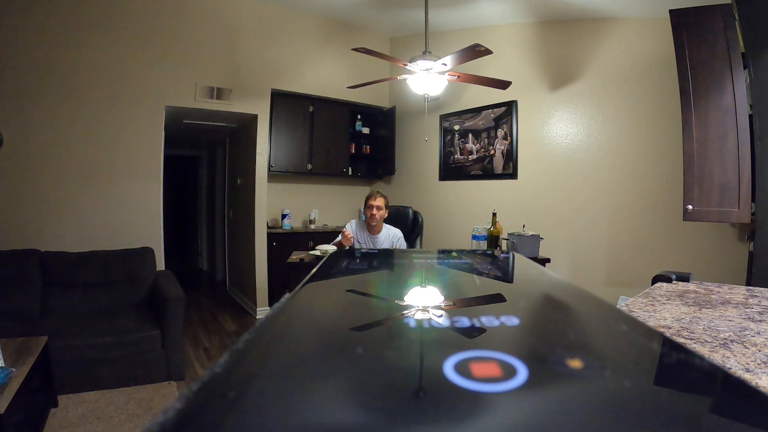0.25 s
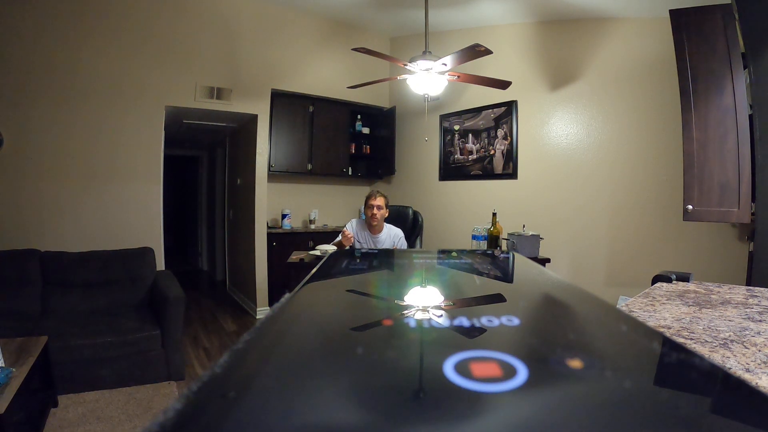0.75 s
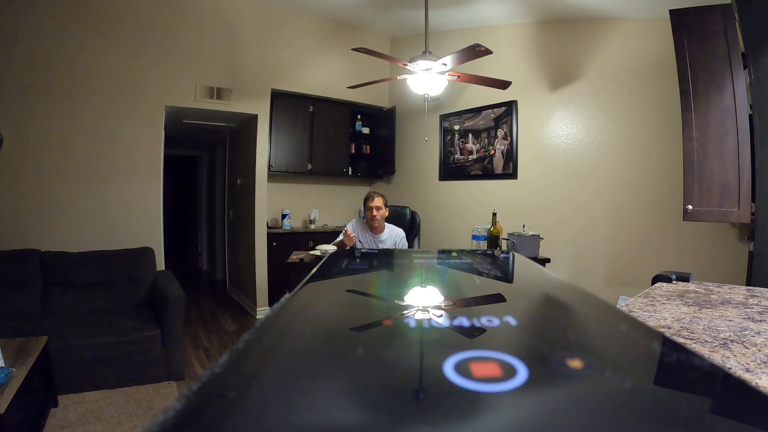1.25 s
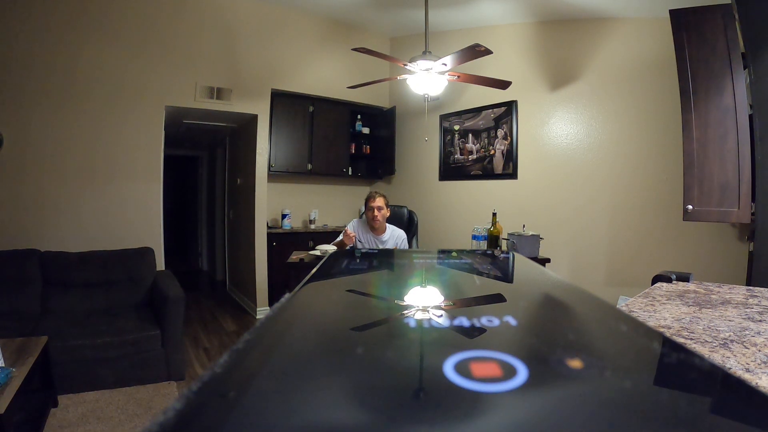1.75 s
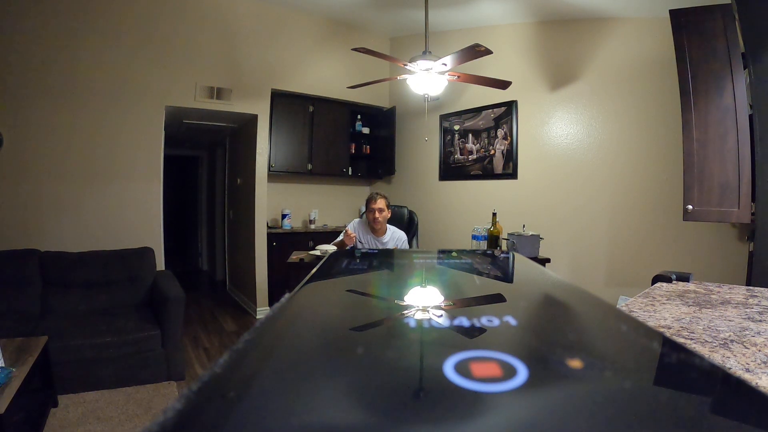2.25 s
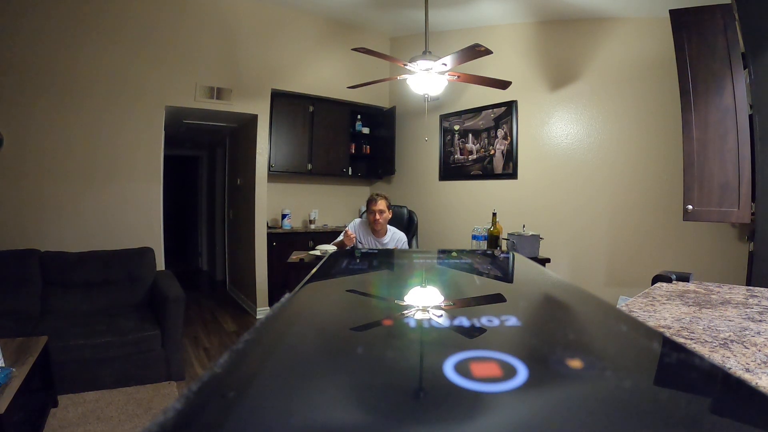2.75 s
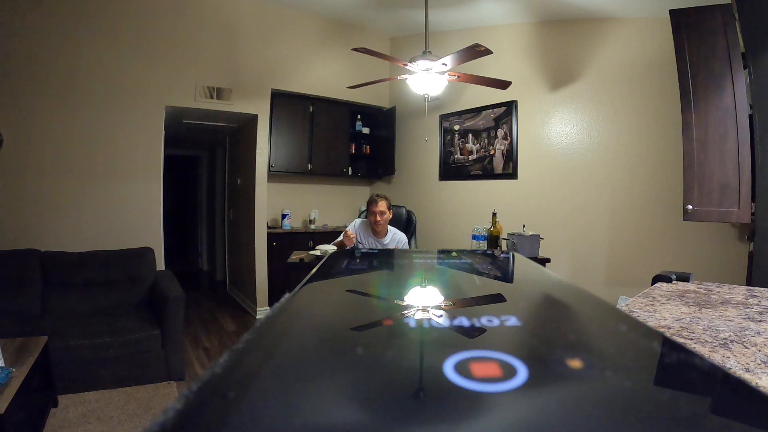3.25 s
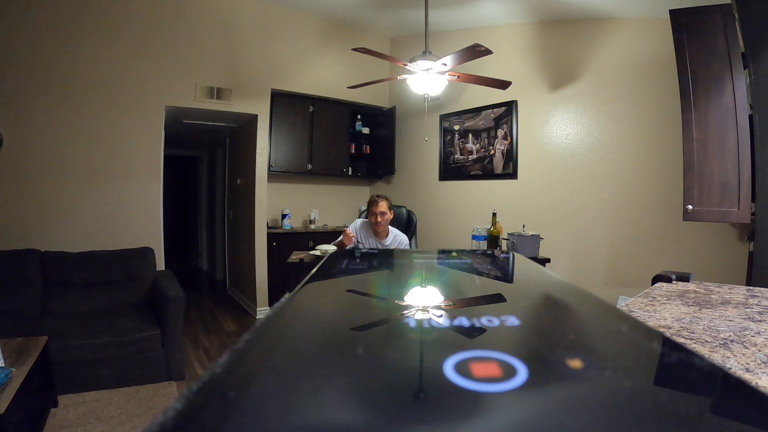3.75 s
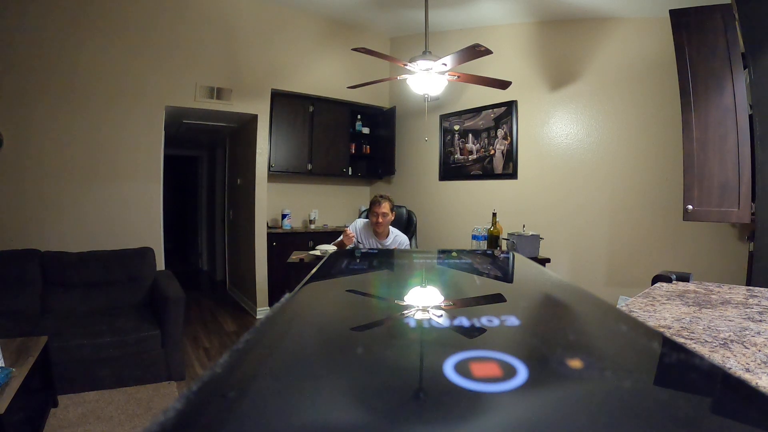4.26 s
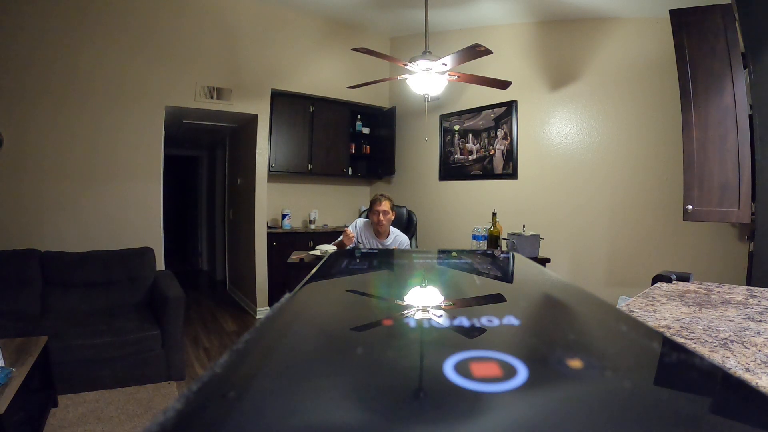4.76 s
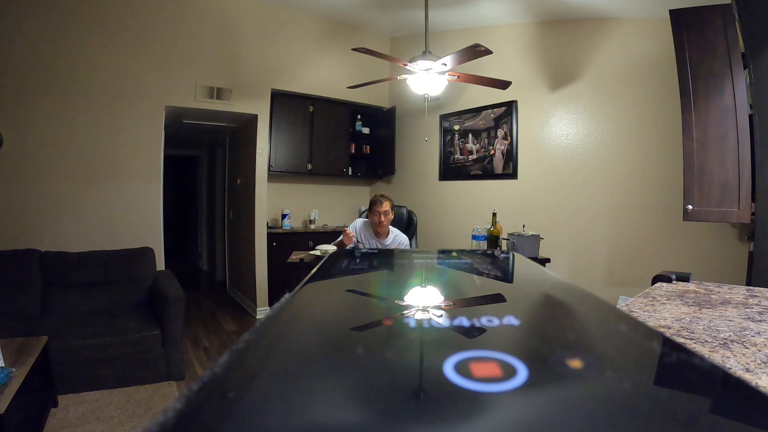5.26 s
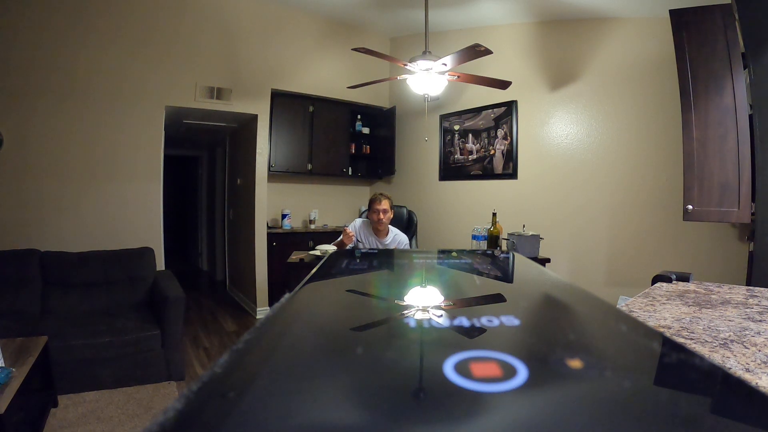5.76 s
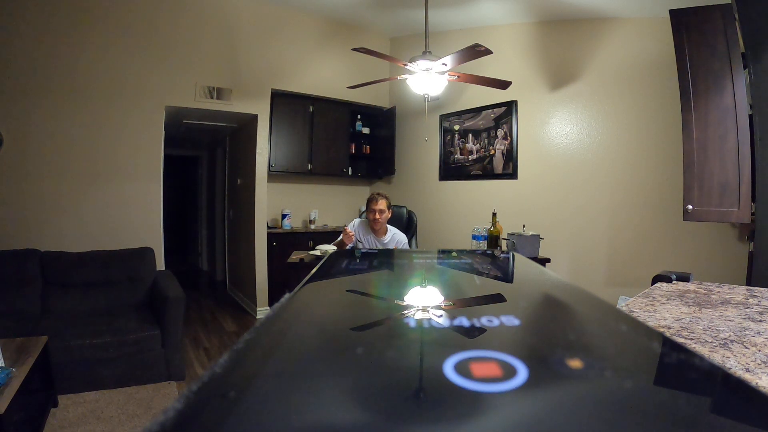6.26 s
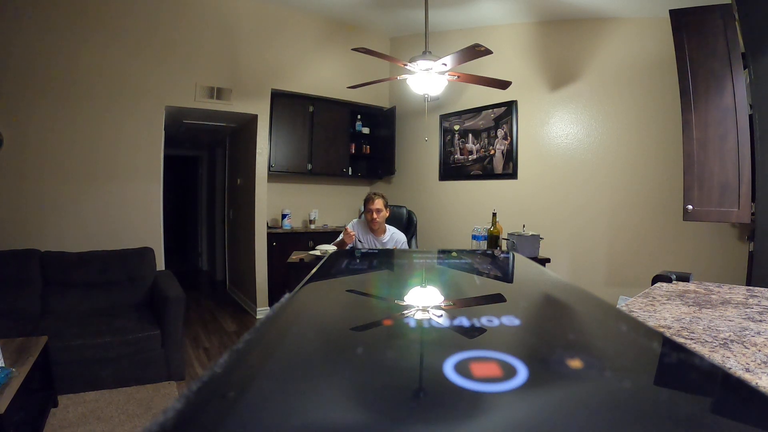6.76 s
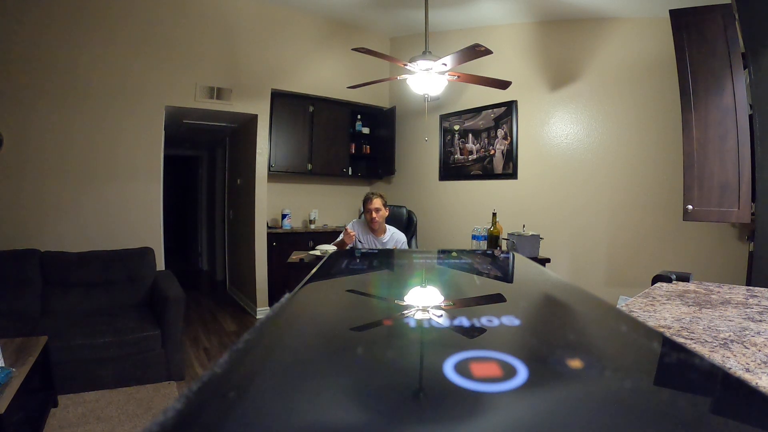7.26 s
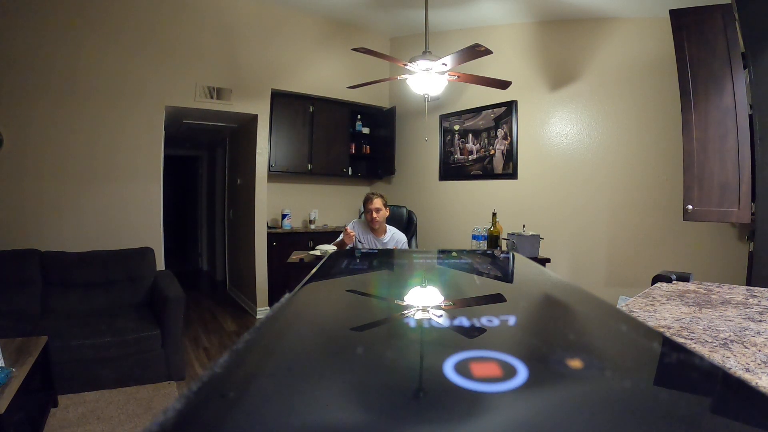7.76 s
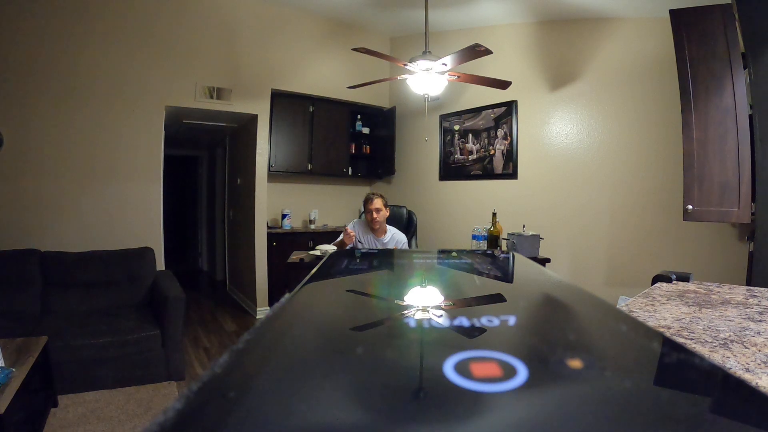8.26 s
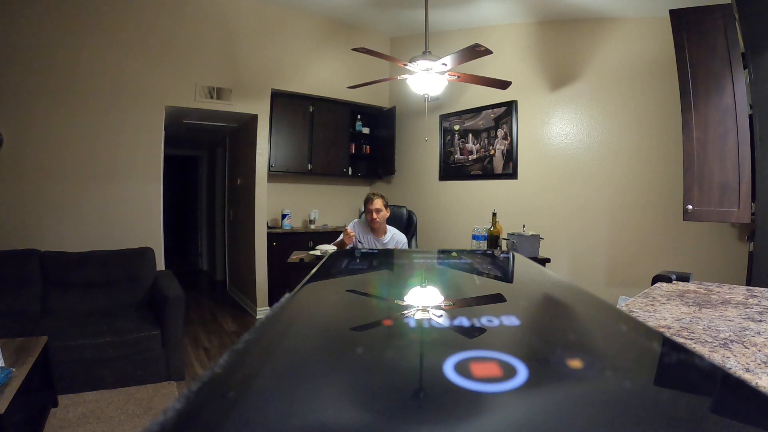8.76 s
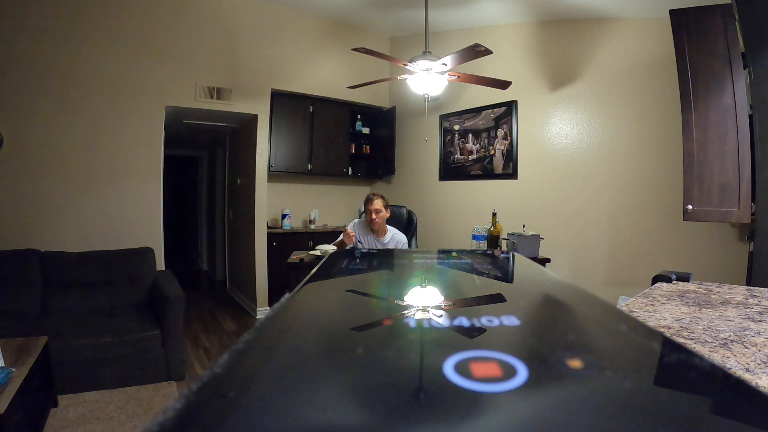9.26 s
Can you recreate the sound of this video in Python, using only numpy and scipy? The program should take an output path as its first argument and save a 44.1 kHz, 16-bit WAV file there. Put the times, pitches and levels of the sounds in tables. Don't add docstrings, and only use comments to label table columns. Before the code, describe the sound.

A quiet furnished living room, heard in stereo from a table top. Throughout, a refrigerator across the room gives a deep buzzing hum with a gentle throb about every third of a second, low fan tones, soft moving air and a thin, faint high whine that strengthens slightly later. Very light cloth rustles come and go from the start. A small crisp tick sounds at 1.2 s, a dull knock with a brief chair creak at 1.8 s. Rustling grows from 2.2 to 3 s, then at 3.1 to 3.3 s a rapid run of knocks rattles the table, close, woody and short, with a strong tick inside and weaker bumps until 3.45 s. Faint cloth follows until about 6 s, with a barely audible creak near 6. Dull little ticks come at 8.0 and 8.4 s; the hum continues unchanged to the end, near 9.5 s.

```python
import sys
import numpy as np
from scipy import signal
from scipy.fft import rfft, irfft, next_fast_len
from scipy.io import wavfile
from scipy.ndimage import uniform_filter1d

SR = 44100
rng = np.random.default_rng(int(sys.argv[2]) if len(sys.argv) > 2 else 0)


def transcribe(signal):
    frames = np.atleast_2d(signal).T
    limited = np.clip(frames, -1, 1)
    pcm = np.round(limited * 32767).astype(np.int16)
    wavfile.write(sys.argv[1], SR, pcm)


def decibels_to_gain(level_db):
    exponent = np.asarray(level_db, float) / 20
    return 10 ** exponent


N = 419391
TIME = np.arange(N) / SR
LONG = next_fast_len(N)
HZ = np.fft.rfftfreq(LONG, 1 / SR) + 1e-3

SHAFT_HZ, MAINS_HZ = 58.507, 119.99
THROB_S, SLIP_DEPTH = .125, .12
ROOM_T60_S, ROOM_TOP_T60_S = .45, .35

# (order [multiple of shaft], level [dB], left minus right [dB])
SHAFT_ORDERS = [(2, -49, 2.5), (3, -63.5, 0), (4, -55.5, 1.5), (5, -58.5, 4), (6, -53.5, 3), (7, -61, 3),
                (9, -62.5, 5.5), (13, -78, 3), (19, -82, 2), (31, -73.5, 4), (32, -78.5, 6.5),
                (40, -85.5, 2), (42, -86.5, 1), (49, -90, 10.5), (53, -80.5, 3.5), (54, -78, 1),
                (55, -83, 4), (57, -85.5, 9.5), (58, -82.5, 7.5), (59, -94.5, 14), (25, -93, 4),
                (34, -86.5, 4), (45, -101, 0), (51, -91.5, 0), (52, -90, 7), (8, -73.5, 1), (10, -79, 5),
                (11, -86, 3), (12, -85, 1), (14, -97, -6), (15, -83, 0), (17, -93, 4), (20, -91, 4),
                (21, -97, -6), (22, -103, -6), (24, -101, -6), (26, -99, 6), (27, -108, 0), (28, -94, 1),
                (30, -94, -3), (33, -86.5, 3), (36, -95, 11), (37, -99, 9), (38, -101, 8), (47, -93.5, 1),
                (60, -99, 14)]
# (order [multiple of shaft], level [dB], left minus right [dB])
VALVE_ORDERS = [(66, -90, 6), (68, -92, 9), (69, -90, 6), (71, -86.5, 0.5), (72, -90, 6), (73, -79.5, 9),
                (74, -76, 12), (75, -96, -2), (76, -84.5, 7), (77, -88, 2.5), (80, -99, 0), (86, -91, 7),
                (97, -93, 5), (101, -93.5, -4), (113, -91, -12), (114, -90.5, -9), (115, -92.5, 4),
                (116, -93.5, -4), (118, -104, -6), (125, -92, 8), (126, -96, 7), (128, -92, -5),
                (129, -98, 16), (61, -93, 5), (62, -108, -6), (63, -102, 7), (65, -101, 12), (67, -92, -6),
                (70, -102, 9), (82, -93, 8), (87, -92, 7), (89, -99, 7), (92, -98, 7), (94, -96, 5),
                (100, -95, 0), (104, -108, 7), (112, -96, 6), (117, -101, 1), (123, -97, 6), (131, -100, 3),
                (134, -110, -10), (136, -113, 0), (137, -106, -12), (144, -114, 6), (146, -115, 0),
                (151, -106, 7), (152, -108, 2), (154, -116, 2)]
# (frequency [Hz], level [dB])
SHELL_LEVEL = [(500, -89.5), (1000, -89), (2500, -94), (3700, -98), (5000, -97), (6300, -106), (7400, -100),
               (8200, -116), (9000, -114)]
# (time [s], level [dB])
VALVE_DRIFT = [(0, -2.5), (1.5, -3.5), (3, -3), (4.5, -.5), (6, .5), (7.5, -.5), (9.5, .5)]
# (frequency [Hz], level [dB], wander [dB])
FAN_TONES = [(43.04, -72, 1), (51.74, -59, 1.5), (64.26, -69, 1), (96.7, -67, 1), (188.26, -68, .8),
             (206.89, -50, 1.5), (301.15, -60, 1.2), (376.44, -59, 1.2), (489.5, -76, 2), (773, -86, 2),
             (4404.87, -88, 1.5)]
# (time [s], peak level [dB], contact [ms], low mode level [dB])
TABLE_BLOWS = [(3.113, -31, 1.6, 0), (3.122, -27, 1.3, -2), (3.133, -28, 1.2, -3), (3.149, -30, 1.0, -2),
               (3.165, -31, 3, 2), (3.177, -21, 1.8, 3), (3.189, -26, .9, -1), (3.198, -29, .7, -4),
               (3.209, -22, .9, -5), (3.222, -29, .8, -3), (3.234, -29, .8, -4), (3.248, -33, .9, -3),
               (3.265, -28, 1.8, -3), (3.356, -36, 3, -8), (3.406, -27, 2.5, -14), (3.439, -33, 3, -12)]
# (frequency [Hz], level [dB], T60 [s])
TABLE_MODES = [(36, -13, .3), (55, -6, .3), (113, -13, .15), (172, 3, .18), (214, -2, .08), (244, 2, .17),
               (290, -3, .07), (350, -2, .06), (431, -1, .07), (505, -2, .06), (640, -6, .025),
               (800, -4, .022), (1000, -3, .022), (1841, -15, .04)]
# (start [s], length [s], level [dB], drag [dB], edge [dB])
CLOTH_SLIDES = [(-.1, .3, -80, 6, -6), (.27, .14, -79, 5, 0), (.48, .4, -79, 5, -5), (.95, .22, -80, 2, -1),
                (1.35, .45, -83, 5, -4), (1.825, .11, -76, 5, 2), (1.98, .2, -80, 7, -3),
                (2.2, .24, -75, 0, -6), (2.4, .3, -71, 2, -5), (2.7, .38, -72, 1, -4),
                (3.108, .055, -66, 10, 0), (3.172, .055, -60, 9, -4), (3.35, .2, -74, 4, -4),
                (3.6, .12, -82, 0, -6), (3.88, .12, -78, 5, -10), (4.03, .1, -76, 2, -14),
                (4.38, .15, -77, 2, -8), (4.55, .18, -78, 4, -10), (5.7, .15, -81, 2, -12),
                (5.86, .12, -79, 0, -8), (6.05, .3, -85, 0, -6), (8.035, .04, -79, 5, -9),
                (8.42, .04, -85, 0, -2)]
# (frequency [Hz], density [dB per Hz])
CLOTH_HISS = [(1500, -40), (2400, -14), (3200, -1), (4000, 4), (5000, -2), (7000, -33), (9000, -58)]
# (frequency [Hz], density [dB per Hz])
CLOTH_DRAG = [(300, -30), (600, -3), (1000, 1), (1400, -1), (2000, 3), (2700, -4), (3400, -12), (6000, -55)]
# (frequency [Hz], density [dB per Hz])
CLOTH_EDGE = [(3000, -36), (4300, -6), (5500, 3), (7000, 0), (8300, -7), (10500, -19), (12500, -19),
              (15000, -30)]
# (time [s], peak level [dB], brightness [dB])
TICKS = [
    (0.002, -53, -4),
    (1.182, -38.5, 0),
    (1.49, -59, -8),
    (1.824, -46.5, -15),
    (3.126, -52, 4),
    (3.183, -40, -2),
    (4.47, -61, 3),
    (8.04, -57, -7),
    (8.358, -52.5, -8),
    (8.425, -75, 9),
]
# (frequency [Hz], level [dB], T60 [s])
TICK_MODES = [(850, -1, .007), (1250, 0, .005), (1900, -1, .005), (2600, -2, .0045), (3400, -2, .005),
              (4400, -4, .004), (5700, -5, .005), (7000, -11, .003), (8600, -17, .003)]
# (time [s], length [s], pitch [Hz], level [dB])
CREAKS = [
    (1.826, .06, 1900, -69),
    (5.96, .07, 2020, -81),
]
# (frequency [Hz], density [dB per Hz])
AIR_DENSITY = [(20, -84), (32, -88), (48, -76.5), (140, -78.5), (330, -77.5), (480, -81), (600, -88.5),
               (1000, -95.5), (1900, -101), (2500, -109), (7200, -117), (8000, -125), (10300, -136),
               (12500, -138)]
# (frequency [Hz], width [Hz], lift [dB])
AIR_RESONANCES = [(113, 14, 5.5), (182, 25, 3.5), (212, 26, 11.5), (237, 10, 6.5), (70, 14, 3),
                  (126, 8, -3), (199, 6, -8), (229, 5, -8), (256, 14, -5), (278, 10, 4), (384, 10, -9),
                  (404, 8, -5), (440, 30, 1), (473, 8, -6), (579, 10, -7), (2610, 30, 4), (1830, 200, -0.5),
                  (3200, 700, 3), (4320, 150, 6), (5000, 500, 3), (6650, 200, -2.5), (7400, 300, 4)]
# (start [s], length [s], level [dB])
HISS_PATCHES = [
    (.3, .3, 0),
    (.9, .3, 0),
    (4.35, .4, 0),
    (4.87, .2, 1),
    (5.3, .25, -1),
    (5.88, .2, 1),
    (6.85, .7, 1),
    (7.92, .68, 1),
    (8.95, .15, -1),
    (9.35, .3, 0),
]
# (frequency [Hz], density [dB per Hz])
PATCH_DENSITY = [(7000, -170), (9500, -135), (12500, -133), (14500, -145)]
# (frequency [Hz], correlation [0 to 1])
PORT_LIKENESS = [(40, .9), (120, .97), (500, .92), (1000, .55), (2000, .5), (4000, .1), (9000, 0.)]
# (frequency [Hz], left minus right [dB])
PORT_BALANCE = [(60, 0.5), (500, 2), (1000, 0.1), (2800, 1.5), (4800, 5), (8400, -1), (10500, -4.5)]


def along(table, hz):
    f, value = np.transpose(table)
    return np.interp(np.log(hz), np.log(f), value)


def walk(rate):
    hold = int(SR / rate)
    steps = np.repeat(rng.standard_normal(N // hold + 1), hold)
    return 1.3 * uniform_filter1d(uniform_filter1d(steps, hold), hold)[:N]


def pair(db, likeness):
    parts = rng.standard_normal((2, 2, len(HZ)))
    mid, side = (parts[0] + 1j * parts[1]) * decibels_to_gain(db) * np.sqrt(LONG * SR / 4)
    c = np.clip(likeness, 0, 1)
    shared = np.sqrt((1 + c) / 2) * mid
    opposed = np.sqrt((1 - c) / 2) * side * np.array([[1], [-1]])
    return irfft(shared + opposed, LONG)[:, :N]


def tone(hz, db, phase):
    return np.sqrt(2) * decibels_to_gain(db) * np.cos(2 * np.pi * hz * (TIME - THROB_S) + phase)


def ring(modes):
    hz, db, t60 = np.transpose(modes)[:, :, None]
    t = TIME[:SR // 3]
    sign = (-1.) ** np.arange(len(hz))[:, None]
    return sign * decibels_to_gain(db - 60 * t / t60) * np.sin(2 * np.pi * hz * t)


def compressor():
    top, turns = 156, 100
    order = np.arange(top)
    chance = rng.standard_normal((top, 2)).T
    phase = rng.uniform(0, 2 * np.pi, (top, 2)).T
    db = along(SHELL_LEVEL, order * SHAFT_HZ + 1) + 4.5 * np.clip(chance[0], -3, 1.3)
    db = db - 99 * (order < 8)
    pan_db = 6.5 * chance[1]
    for table in (SHAFT_ORDERS, VALVE_ORDERS):
        for m, strong_db, left_db in table:
            db[int(m)] = strong_db
            pan_db[int(m)] = left_db - along(PORT_BALANCE, m * SHAFT_HZ)
    whine = order > 60
    valve = whine & (order < 79)
    wobble = abs(order - 54) < 3
    phase[0, wobble] = np.pi / 2 * order[wobble] ** 2
    side = np.array([[.5], [-.5]])
    angle = phase[0] * (order > 2) + .6 * side * phase[1] * whine
    lines = decibels_to_gain(db + side * pan_db) * np.exp(1j * angle)
    size = int(round(turns * SR / SHAFT_HZ))
    spectra = np.zeros((2, 2, size // 2 + 1), complex)
    spectra[:, :, :top * turns:turns] = lines * ~valve * decibels_to_gain(-2.5 * whine), lines * valve
    cycles = irfft(spectra, size) * size / np.sqrt(2)
    hum, valve_note = cycles[:, :, (np.arange(N) - int(THROB_S * SR)) % size]
    slip = np.cos(2 * np.pi * (MAINS_HZ - 2 * SHAFT_HZ) * (TIME - THROB_S))
    drift_db = np.interp(TIME, *np.transpose(VALVE_DRIFT)) + 1.2 * walk(3)
    shell = hum + valve_note * decibels_to_gain(drift_db)
    return shell * (1 + SLIP_DEPTH * slip) * decibels_to_gain(.6 * walk(1.5)) + tone(MAINS_HZ, -56.5, 0)


def fans():
    drift = .3 * walk(1.5)
    out = np.zeros(N)
    for hz, db, wander_db in FAN_TONES:
        out += tone(hz, db + wander_db * walk(2.5), rng.uniform(0, 2 * np.pi) + drift)
    return out


def bumps():
    out, modes = np.zeros(N + SR), ring(TABLE_MODES)
    length = modes.shape[1]
    low = np.array(TABLE_MODES)[:, 0] < 200
    chance = rng.standard_normal((len(TABLE_BLOWS), len(modes)))
    for (s, db, contact_ms, low_db), c in zip(TABLE_BLOWS, chance):
        push = np.hanning(int(max(contact_ms, .3) * SR / 1000) + 2)
        ringing = decibels_to_gain(1.5 * c + low * low_db) @ modes
        blow = np.convolve(ringing, push / push.sum())[:length]
        out[int(s * SR):][:length] += decibels_to_gain(db) * blow
    return decibels_to_gain(-6) * out[:N]


def ticks():
    out, modes = np.zeros(N + SR), ring(TICK_MODES)
    bright = np.array(TICK_MODES)[:, 0] > 3000
    chance = rng.standard_normal((len(TICKS), len(modes)))
    for (s, db, bright_db), c in zip(TICKS, chance):
        out[int(s * SR):][:modes.shape[1]] += decibels_to_gain(db + 1.5 * c + bright * bright_db) @ modes
    absorb = signal.butter(4, 9500, fs=SR, output="sos")
    return decibels_to_gain(-9) * signal.sosfilt(absorb, out[:N])


def creaks():
    out, glide = np.zeros(N), .06
    for s, length, hz, db in CREAKS:
        done = np.clip((TIME - s) / length, 0, 1)
        swell = np.sin(np.pi * np.sqrt(done))
        out += decibels_to_gain(db) * swell * np.sin(2 * np.pi * hz * length * done * (1 + glide * done / 2))
    return out * decibels_to_gain(7 * walk(250))


def cloth():
    power = np.zeros((3, N))
    for s, length, db, drag_db, edge_db in CLOTH_SLIDES:
        since = TIME - s
        settle_t60 = .3 + 1.6 * length
        settle_db = -60 * np.clip(since - length, 0, 2) / settle_t60
        slide = np.clip(since / (.4 * length), 0, 1) * decibels_to_gain(settle_db)
        power += (slide * decibels_to_gain(db + np.array([[0], [drag_db], [edge_db]]))) ** 2
    colours = along(CLOTH_HISS, HZ) - 28, along(CLOTH_DRAG, HZ) - 29, along(CLOTH_EDGE, HZ) - 30
    out = np.zeros((2, N))
    for gain, density in zip(np.sqrt(power), colours):
        grain = decibels_to_gain(1.1 * walk(90))
        out += gain * grain * pair(density, along(PORT_LIKENESS, HZ) + .3)
    return out


def air():
    lift_db = sum(db / (1 + (2 * (HZ - hz) / width) ** 2) for hz, width, db in AIR_RESONANCES)
    rumble_cut_db = 40 * np.log10(1 + (8 / HZ) ** 2)
    density = along(AIR_DENSITY, HZ) + lift_db - rumble_cut_db
    return pair(density, along(PORT_LIKENESS, HZ)) * decibels_to_gain(.4 * walk(3))


def hiss_patches():
    gain = np.zeros(N)
    for s, length, db in HISS_PATCHES:
        edge = np.minimum(TIME - s, s + length - TIME) / .04
        gain += decibels_to_gain(db) * np.clip(edge, 0, 1)
    return gain * pair(along(PATCH_DENSITY, HZ), .1)


def room(near, far):
    t = TIME[:SR // 2]
    echoes = pair(0, along(PORT_LIKENESS, HZ))[:, :len(t)] / SR
    low = signal.sosfilt(signal.butter(1, 3000, fs=SR, output="sos"), echoes)
    tail = low * decibels_to_gain(-60 * t / ROOM_T60_S) + (echoes - low) * decibels_to_gain(-60 * t / ROOM_TOP_T60_S)
    tail = tail * (1 - np.exp(-t / .004))
    return near + signal.oaconvolve(far[None], tail, axes=1)[:, :N]


def scene():
    steady = compressor() + fans() + cloth() + air() + hiss_patches()
    bump, tick, creak = bumps(), ticks(), creaks()
    far = decibels_to_gain(13) * bump + decibels_to_gain(39) * tick + decibels_to_gain(26) * creak
    return steady + room(bump + tick + creak, far)


def roll_off(x):
    return signal.sosfilt(signal.butter(12, 14800, fs=SR, output="sos"), x)


def record(dry):
    side = np.array([[.5], [-.5]])
    lag = np.exp(-2j * np.pi * HZ * side * 2.5 / SR)
    ports = decibels_to_gain(side * along(PORT_BALANCE, HZ)) * lag
    mix = irfft(rfft(dry, LONG) * ports, LONG)[:, :N]
    return roll_off(mix)


dry = scene()
out = record(dry)
transcribe(out)
```